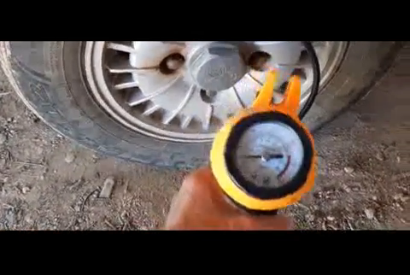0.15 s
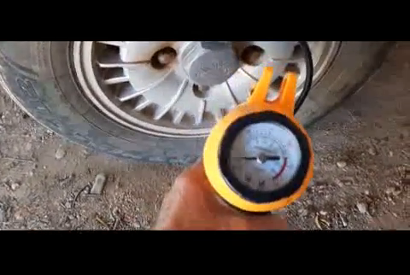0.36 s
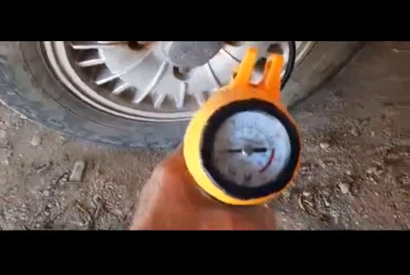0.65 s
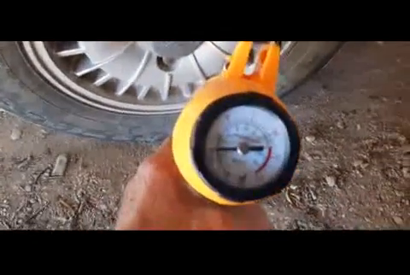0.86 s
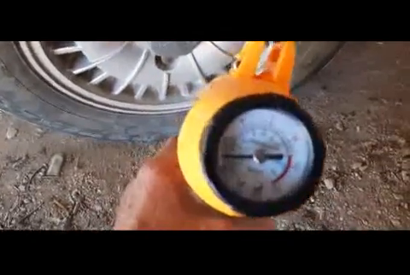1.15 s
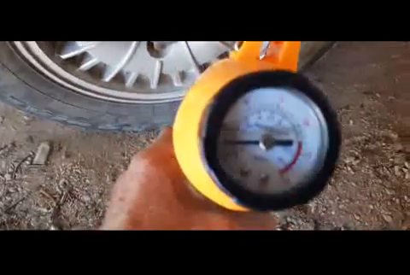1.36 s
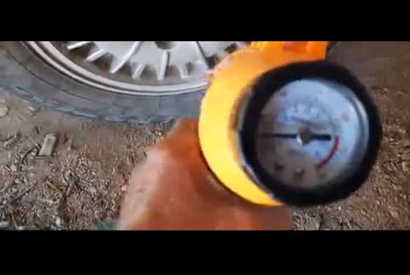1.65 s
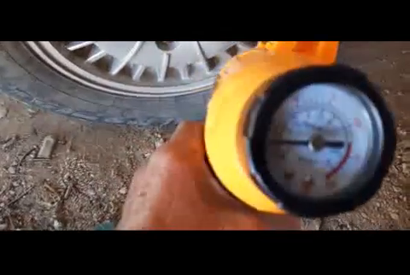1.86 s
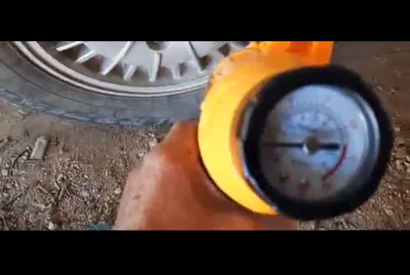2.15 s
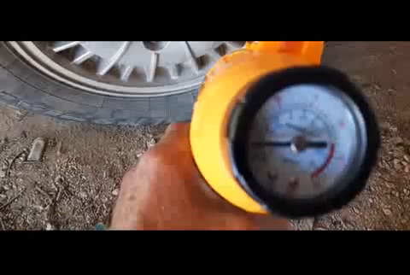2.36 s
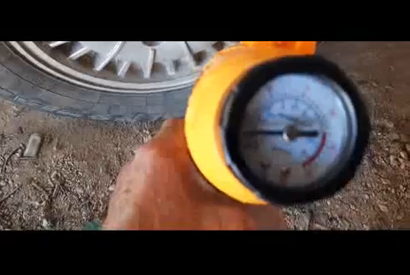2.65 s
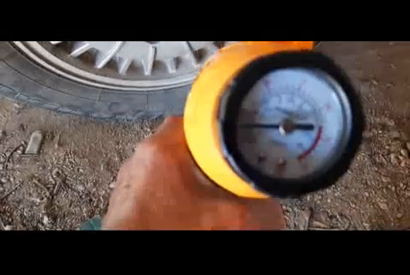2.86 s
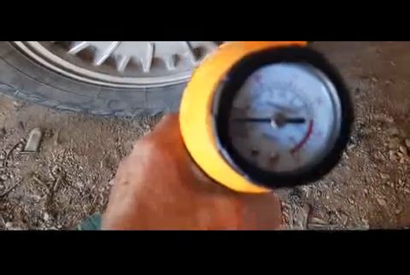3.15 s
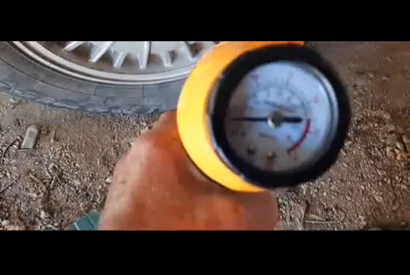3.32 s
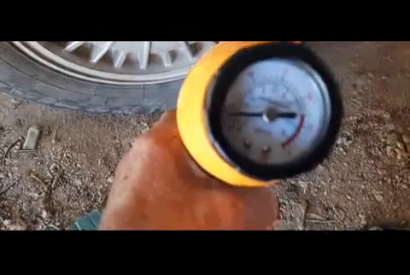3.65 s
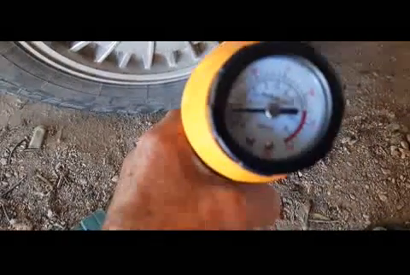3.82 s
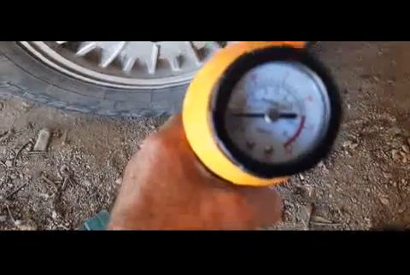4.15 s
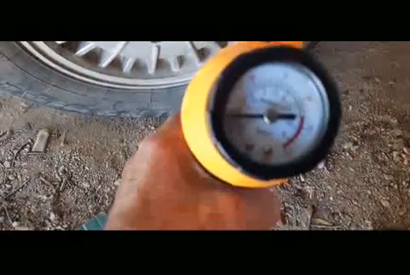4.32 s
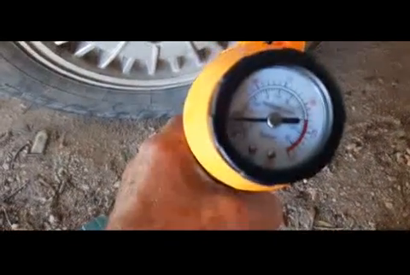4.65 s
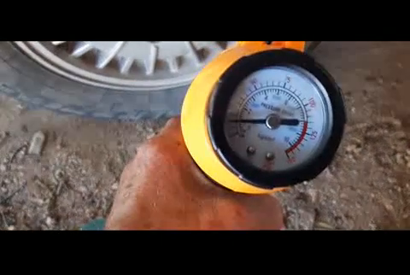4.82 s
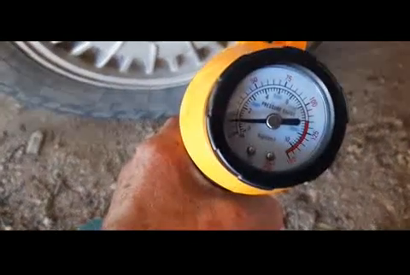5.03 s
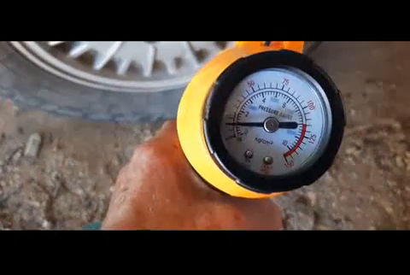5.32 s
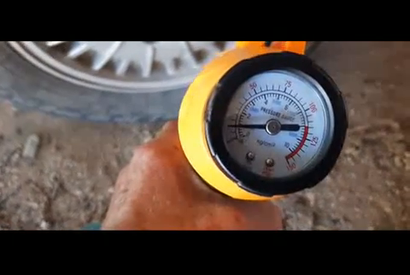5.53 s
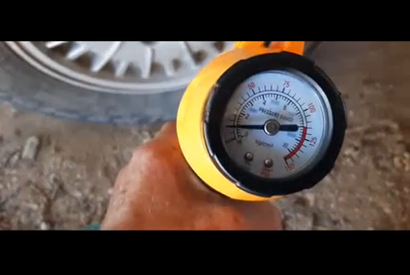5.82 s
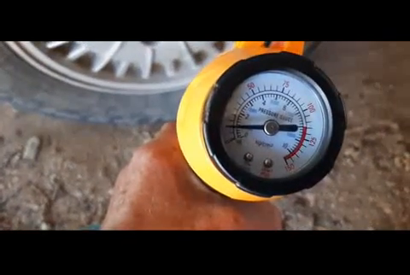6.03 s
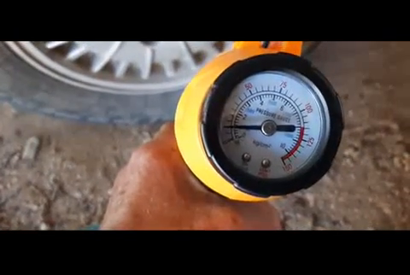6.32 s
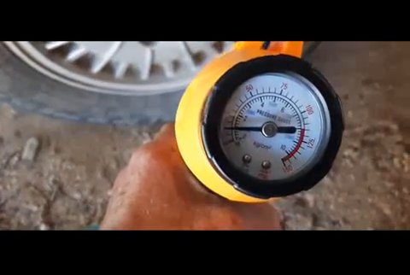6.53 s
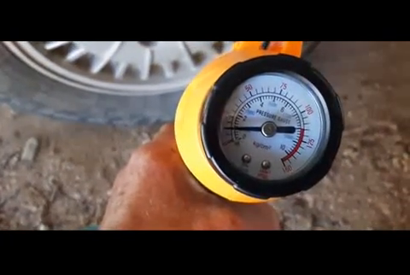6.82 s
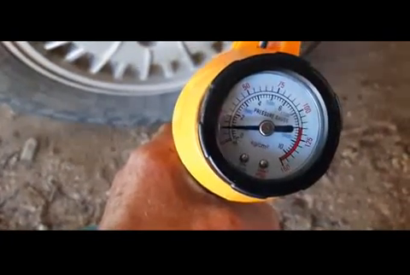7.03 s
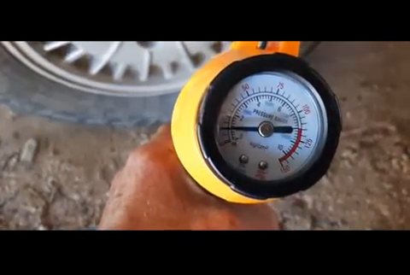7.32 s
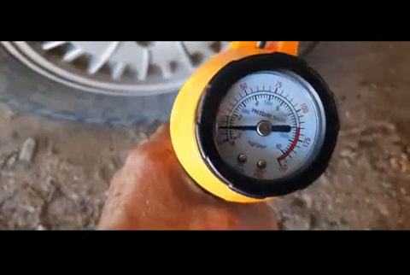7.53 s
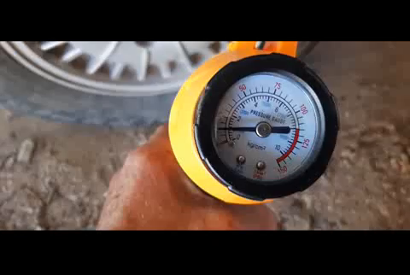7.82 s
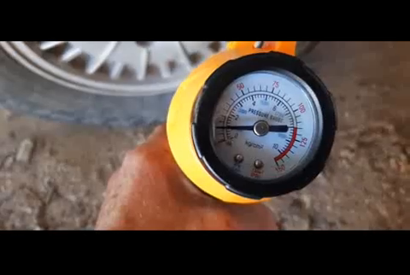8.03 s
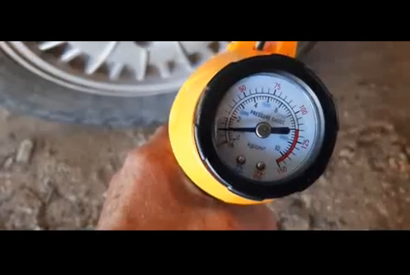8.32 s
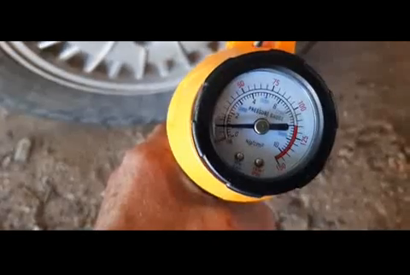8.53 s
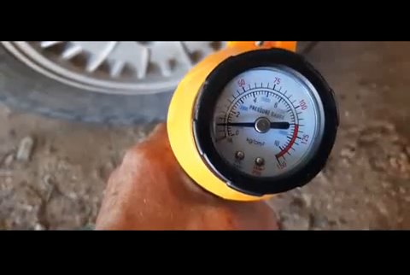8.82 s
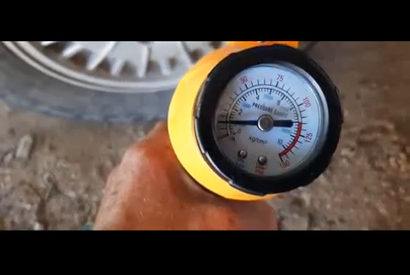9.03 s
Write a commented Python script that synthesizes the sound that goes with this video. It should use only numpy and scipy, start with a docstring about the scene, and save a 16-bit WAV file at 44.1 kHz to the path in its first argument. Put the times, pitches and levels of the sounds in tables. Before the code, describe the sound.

Close, loud droning chatter of a handheld air pump, rapid piston knocks ringing its plastic case over gritty whine and constant hiss.

```python
"""Outdoors: a small electric tyre inflator runs steadily, held in the hand close to two microphones.
The motor drives the crank through pinion and spur gear. Every turn the piston gives a burst of knocks (crank
harmonics) that ring the plastic case, with rattle (noise bursts through resonances) and valve taps (decaying sines).
The gear teeth grind (coloured noise) and squeal once a turn (mesh harmonics with a noisy rough edge).
Air hisses through the pump (pulsed noise) over a low rumble."""
import sys
import numpy as np
from scipy import signal
from scipy.fft import rfft, irfft
from scipy.io import wavfile
from scipy.ndimage import uniform_filter1d

SR = 44100
rng = np.random.default_rng(int(sys.argv[2]) if len(sys.argv) > 2 else 0)


def wav_out(sig):
    """Save sig, one row per channel (or a flat mono array), as 16-bit PCM at SR to the path in sys.argv[1]."""
    wavfile.write(sys.argv[1], SR, np.round(np.clip(np.atleast_2d(sig).T, -1, 1) * 32767).astype(np.int16))


N = 404397
TIME_S = np.arange(N) / SR
FREQS_HZ = np.fft.rfftfreq(N, 1 / SR)

# crank rate, slowing a little as the tyre fills: (time [s], rate [turns/s])
CRANK_RATE = [(0, 59.3), (.4, 59.23), (5, 59.13), (9.17, 59.05)]
GEAR_TEETH, PINION_TEETH = 53, 11
# piston and valve knocks: (place in turn [0-1], level [dB], brightness [dB/kHz])
KNOCKS = [(0.047, 1.5, -2), (0.123, -7.5, 5.5), (0.571, 6.5, -6), (0.692, 3.5, -11.5), (0.8, 5.5, -2),
          (0.91, -0.5, 3.5)]
# steady pump tone: (multiple of crank rate, relative level [dB])
PUMP_ORDERS = [(1, -17), (2, -9.5), (3, -21.5), (4, -18), (5, -23), (6, -20.5), (7, -13), (8, -3),
               (9, -3.5), (10, -9.5), (11, -13.5), (12, -8.5), (13, -12.5), (14, -4), (15, -13.5),
               (16, -10.5), (17, -1), (18, -5), (19, -13), (20, -23), (21, -18.5), (22, -11), (23, -14),
               (24, -16), (25, -9), (26, -2), (27, 0), (28, -2.5), (29, -1.5), (30, -14.5), (32, -26.5),
               (33, -28.5), (35, -22), (40, -24)]
# plastic case resonances: (centre [Hz], width [Hz], level [dB])
CASE_MODES = [(490, 130, -19), (810, 550, -10.5), (1005, 130, -10.5), (1316, 630, -5), (1643, 103, 2)]
# taps of two reed valves and piston seal: (place in turn [0-1], ring [Hz], decay [s], level [dB])
VALVE_TAPS = [(0.3, 2970, 0.002, -38), (0.08, 3400, 0.0011, -40), (.9, 2280, 0.00045, -43)]
# motor shaft lines, the 11th being the steady mesh of the pinion's teeth: (multiple of motor rate, level [dB])
MOTOR_ORDERS = [(1, -49.5), (5, -32), (11, -39)]
# gear grind through the housing: (frequency [Hz], level [dB])
GRIND_COLOUR = [(1850, -1.5), (2050, 0), (2350, 3.5), (2600, -2.5), (2850, 3.5), (3130, -7.5), (3450, 6),
                (3800, -6), (4230, 5), (4400, -10), (4600, 3.5), (4800, -9), (5080, -0.5), (5250, -28)]
# tooth squeal: (multiple of mesh rate, relative level [dB])
SQUEAL_ORDERS = [(2, -8), (3, 4.5), (4, -1)]
# squeal course: (time [s], level [dB])
SQUEAL_LEVEL = [(0, -36), (.65, -40), (.85, -33), (1.2, -32), (2.1, -32), (2.7, -33.5), (3.3, -31.5),
                (4.1, -36), (5.2, -32.5), (6.6, -34), (7.8, -32), (8.3, -32.5), (9.1, -31.5)]
# harshest squeaks: (time [s], peak [dB], left minus right [dB])
SQUEAKS = [(1.474, 0, 6), (2.557, 0, 1), (3.012, 0, 0), (4.634, 0, 0), (4.939, -5, 0), (5.075, -3, -7),
           (5.311, -5, -1), (5.48, -2, 0), (6.104, -3, -2), (6.663, -3, 1), (7.544, -3, 2), (7.561, -2, 2),
           (7.8485, 0, -5), (7.933, -3, 0), (8.779, -2, 0), (8.882, -2, 0)]
# resonances of the squeal's rough edge: (centre [Hz], width [Hz], level [dB])
SIZZLE_MODES = [(6320, 40, 4), (9280, 100, 5.5), (12060, 170, -2.5), (12770, 220, -0.5)]
# air hiss through cylinder and valve: (frequency [Hz], level [dB])
AIR_COLOUR = [(5300, -10.5), (5700, -6.5), (6250, -3), (6600, -11.5), (7700, -9.5), (8100, -36), (8500, -1),
              (9400, 6), (10100, 3), (10500, 5), (11000, 1), (11700, 3), (13000, 1)]
# shaking pump and open air: (frequency [Hz], level [dB])
RUMBLE_COLOUR = [(20, -8), (100, 0.5), (200, -6.5), (380, -4.5), (900, -10.5), (1800, -2.5)]
# flexing side walls: (multiple of crank rate, level [dB])
WALL_ORDERS = [(15, -46), (21, -40), (23, -45), (30, -44), (52, -47)]
# uneven radiation to the microphones: (frequency [Hz], left minus right [dB])
SIDES = [(60, 4.5), (400, 4.4), (520, 3.3), (700, -.5), (830, 0), (1020, -7), (1200, -4.5), (1400, .5),
         (1650, -.5), (2230, -2), (2500, .5), (3400, 0), (4200, 3.5), (4500, 0), (5500, .5), (6270, 3),
         (6500, 0), (8900, 1.5), (9500, -1.5), (9800, 1), (10500, -.5)]
# paths around case and hand: (frequency [Hz], left lead [rad])
LEAD = [(0, 1), (60, 0.5), (300, 0.3), (600, 0.43), (1000, 0.32), (1640, 0.54), (3100, 5), (3530, -2.5),
        (3790, 3.5), (5510, -0.7), (6800, 3.5), (7670, 12.5), (8180, 16.5), (9300, 18.5), (11400, 26),
        (12400, 34.5), (12700, 32), (13400, 36)]
# colour with the pump held further off: (frequency [Hz], gain [dB])
FAR_COLOUR = [(580, 0), (690, -5.5), (850, 0), (1030, -2), (1200, 5), (1450, -1.5), (2300, 0), (3000, 3.5),
              (3800, -6), (4200, 0.5), (5000, -4.5), (6200, 2), (7600, 8), (9000, -2.5), (13000, 1)]
# pump brought closer: (time [s], share of far colour [0-1])
APPROACH = [(0, 1), (.6, 1), (1.1, 0.25)]

KNOCK_DB, RATTLE_DB, GRIND_DB, HISS_DB, RUMBLE_DB = -19, -24.5, -25, -25, -37.5
HISS_WAVER_DB, SQUEAL_WAVER_DB = 0.73, .8
SIZZLE_DB, CATCH_DB, SCRAPE_DB = 1.2, -13.5, -15  # sizzle: relative to SQUEAL_LEVEL
# extra case ring at the nearest pass: bell centre, 1/e half width, peak
NEAREST_S, NEAREST_WIDTH_S, NEAREST_DB = 1.7, 1.05, 1.4
TOP_HZ = 13030


def piston(turns, crank_hz, ring_db, ring_hz=1620, ring_width_hz=190, jitter_turns=0.0016, limp_turns=0.0036):
    """Crank harmonics phased to line up at the knocks; the main case ring has its own gain."""
    place, knock_db, brightness = np.transpose(KNOCKS)
    cycle = np.arange(2048) / 2048
    body, ring = np.zeros((2, len(cycle)))
    for order, db in PUMP_ORDERS:
        order = round(order)
        hz = order * crank_hz
        strength = undb(knock_db + brightness * hz / 1000)
        lag_rad = np.angle(-np.sum(strength * np.exp(-2j * np.pi * order * place)))
        partial = undb(db) * np.cos(2 * np.pi * order * cycle + lag_rad)
        in_ring = np.exp(-((hz - ring_hz) / ring_width_hz) ** 4)
        body += (1 - in_ring) * partial
        ring += in_ring * partial
    # rod play: knocks early or late, often by turns
    limp = limp_turns * walk(11) * np.cos(np.pi * turns)
    angle = turns + jitter_turns * walk(260) + limp
    body = np.interp(angle, cycle, body, period=1)
    ring = np.interp(angle, cycle, ring, period=1)
    return unit(body + undb(ring_db) * ring)


def rattle(turns, loose_db=-8, spread_turns=0.011):
    """Loose parts chatter at every knock, most at the bright ones, and ring the case."""
    chatter = 0
    for place, db, brightness in KNOCKS:
        burst = bump(turns, place, spread_turns, scatter_db=1.0, wander_turns=0.0051)
        chatter = chatter + undb(db + brightness) * burst
    ring = resonate((undb(loose_db) + chatter) * stereo_noise(alike=0.72), CASE_MODES)
    return unit(np.tanh(ring / 2.5))  # little room to move limits the swing


def valves(turns, scatter_db=4.5, jitter_s=.00004):
    """Each reed and the seal slap once a turn, ring briefly, and vary in force and timing."""
    taps = 0
    for place, hz, decay_s, db in VALVE_TAPS:
        own = turns - place
        delay_s = jitter_s * (2 + per_turn(own))
        age_s = np.maximum(own % 1 / CRANK_RATE[0][1] - delay_s, 0)
        ring = np.sin(2 * np.pi * hz * age_s) * age_s * np.exp(-age_s / decay_s)
        taps = taps + undb(db) * unit(ring * undb(scatter_db * per_turn(own)))
    return taps


def motor(turns, wobble_turns=0.0088):
    """Clean lines locked to the motor shaft, geared nearly five times as fast as the crank; the 11th is the
    pinion's tooth mesh."""
    shaft = turns * GEAR_TEETH / PINION_TEETH + wobble_turns * walk(10)
    return sum(np.sqrt(2) * undb(db) * np.sin(2 * np.pi * round(order) * shaft) for order, db in MOTOR_ORDERS)


def gears(turns, surge_db=1.3, grain_db=0.15, tick_db=-3):
    """Rough teeth grind, and tick as the first four knocks take up their play."""
    ticks = sum(bump(turns, place, .012, scatter_db=3, wander_turns=.005) for place, _, _ in KNOCKS[:4])
    load = (1 + undb(tick_db) * ticks) * undb(surge_db * walk(70) + grain_db * walk(400))
    grind = colour(stereo_noise(alike=0.38) * load, GRIND_COLOUR)
    return waver(grind, np.linspace(2000, 5000, 12), rate_hz=25, depth_db=2)


def tooth_bite(turns):
    """Tooth pressure, one broad swell a turn."""
    return unit(bump(turns, .345, .075, scatter_db=2.4, wander_turns=.02))


def squeal(turns, force, slip_cycles=0.016):
    """Teeth sing at multiples of the mesh rate, slipping a little out of step."""
    mesh = turns * GEAR_TEETH + slip_cycles * walk(310)
    tone = sum(undb(db) * np.sin(2 * np.pi * round(order) * mesh) for order, db in SQUEAL_ORDERS)
    return force * unit(tone)


def tooth_catches(decay_s=.0008):
    """Force at each microphone where a tooth catches hard: two-sided exponential peaks."""
    force = 0
    for at_s, db, pan_db in SQUEAKS:
        side_db = np.array([[pan_db], [-pan_db]]) / 2
        force = force + undb(db + side_db) * np.exp(-np.abs(TIME_S - at_s) / decay_s)
    return force


def sizzle(bite, friction):
    """Rough edge of the squeal: rubbing noise whose resonances rise and fall separately."""
    rub = stereo_noise(alike=.6) * (bite + .25)
    rough = waver(resonate(rub, SIZZLE_MODES), [6270, 9300, 12120, 12870], rate_hz=25, depth_db=2.6)
    return rough * friction * undb(SIZZLE_DB)


def scrape(catch):
    """Noise burst at each hard catch, coloured like the air hiss."""
    return undb(SCRAPE_DB) * catch * colour(stereo_noise(alike=.3), AIR_COLOUR)


def air(turns, surge_db=2.2, puff=0.039, spit=0.13):
    """Turbulent hiss with a puff on each intake stroke and a brief valve spit."""
    intake = bump(turns, .36, .12, scatter_db=3, wander_turns=.04)
    valve = bump(turns, .32, .015, scatter_db=5, wander_turns=.06)
    flow = (1 + puff * intake + spit * valve) * undb(surge_db * walk(70))
    hiss = colour(stereo_noise(alike=0.27) * flow, AIR_COLOUR)
    return waver(hiss, np.linspace(5500, 13000, 18), rate_hz=35, depth_db=2)


def walls(turns):
    """Flexing side walls push one microphone while pulling the other: opposite polarity."""
    tone = 0
    for order, db in WALL_ORDERS:
        partial = np.sin(2 * np.pi * (order * turns + rng.random()))
        tone = tone + undb(db + walk(3)) * np.sqrt(2) * partial
    return np.array([tone, -tone])


def rumble():
    """Low noise of the shaking pump and the open air."""
    return undb(RUMBLE_DB) * colour(stereo_noise(alike=.35), RUMBLE_COLOUR)


def microphones(x):
    """Each side hears its own balance and phase of the pump's sound."""
    ratio = undb(along(SIDES, FREQS_HZ))
    half_lead = np.exp(.5j * np.interp(FREQS_HZ, *np.transpose(LEAD)))
    sides = np.array([ratio * half_lead, 1 / half_lead]) * 2 / (1 + ratio)
    return irfft(rfft(x) * sides, N)


def approach(x):
    """Crossfade away from the far colour as the hand brings the pump closer."""
    far = irfft(rfft(x) * undb(along(FAR_COLOUR, FREQS_HZ)), N)
    return x + (far - x) * np.interp(TIME_S, *np.transpose(APPROACH))


def undb(db):
    """Decibels to gain."""
    return 10 ** (np.asarray(db) / 20)


def unit(x):
    """Scale to rms 1."""
    return x / np.sqrt(np.mean(x ** 2))


def along(points, hz):
    """Read (frequency [Hz], value) points on a log-frequency axis."""
    f_hz, value = np.transpose(points)
    return np.interp(np.log(hz + 1), np.log(f_hz), value)


def colour(x, points):
    """Filter x by (frequency [Hz], level [dB]) points, steep beyond the ends; rms 1."""
    low_skirt = np.minimum(FREQS_HZ / points[0][0], 1) ** 10
    high_skirt = np.minimum(points[-1][0] / (FREQS_HZ + 1), 1) ** 10
    return unit(irfft(rfft(x) * undb(along(points, FREQS_HZ)) * low_skirt * high_skirt, N))


def resonate(x, modes):
    """Filter x by summed (centre [Hz], width [Hz], level [dB]) resonances; rms 1."""
    response = sum(undb(db) / (1 + (2 * (FREQS_HZ - hz) / width_hz) ** 2) for hz, width_hz, db in modes)
    return unit(irfft(rfft(x) * response, N))


def waver(x, edges_hz, rate_hz, depth_db):
    """Let overlapping bands of x rise and fall, each on its own."""
    spectrum = rfft(x)
    out = 0
    for band in np.eye(len(edges_hz)):
        part = irfft(spectrum * np.interp(FREQS_HZ, edges_hz, band), N)
        out = out + part * undb(depth_db * walk(rate_hz))
    return out


def walk(rate_hz):
    """Random levels, a new one each 1 / rate_hz, joined by slews; rms 1."""
    hold = int(SR / rate_hz)
    steps = np.repeat(rng.standard_normal(N // hold + 1), hold)
    return unit(uniform_filter1d(steps, hold)[:N])


def stereo_noise(alike):
    """White noise at two microphones, with a share of power in common."""
    common, *own = rng.standard_normal((3, N))
    return np.sqrt(alike) * common + np.sqrt(1 - alike) * np.array(own)


def per_turn(turns):
    """One bounded random value for each turn."""
    return np.clip(rng.standard_normal(1024), -2, 2)[np.floor(turns).astype(int)]


def bump(turns, place, width_turns, scatter_db, wander_turns):
    """Gaussian bump once a turn, each with its own size and a slightly different place."""
    own = turns - place + .5
    offset = own % 1 - .5 + wander_turns * per_turn(own)
    return np.exp(-.5 * (offset / width_turns) ** 2) * undb(scatter_db * per_turn(own))


def scene():
    """Crank angle drives the pump's parts; the colour shifts as the hand brings it close."""
    crank_hz = np.interp(TIME_S, *np.transpose(CRANK_RATE))
    turns = .055 + np.cumsum(crank_hz) / SR
    nearest_db = NEAREST_DB * np.exp(-((TIME_S - NEAREST_S) / NEAREST_WIDTH_S) ** 2)
    knocks = piston(turns, crank_hz.mean(), nearest_db) * undb(KNOCK_DB + nearest_db / 2)
    # case tone shifts gently as the hand sways
    knocks = waver(knocks, [500, 680, 850, 1150, 1350, 1600], rate_hz=.8, depth_db=.35)
    strokes = knocks + rattle(turns) * undb(RATTLE_DB + nearest_db) + valves(turns)

    bite = tooth_bite(turns)
    friction = undb(np.interp(TIME_S, *np.transpose(SQUEAL_LEVEL)) + SQUEAL_WAVER_DB * walk(4.4))
    catch = tooth_catches()
    sing = squeal(turns, bite * friction + catch * undb(CATCH_DB))
    teeth = gears(turns) * undb(GRIND_DB) + sing + sizzle(bite, friction) + scrape(catch)

    hiss = air(turns) * undb(HISS_DB + HISS_WAVER_DB * walk(11))
    pump = strokes + motor(turns) + teeth + hiss + rumble()
    return approach(microphones(pump)) + walls(turns)


def record(dry):
    """Soft-limit the highest peaks, then cut the top steeply."""
    rounded = dry / (1 + (dry / .85) ** 6) ** (1 / 6)
    low_pass = signal.ellip(12, .2, 80, TOP_HZ, fs=SR, output="sos")
    return signal.sosfilt(low_pass, rounded)


dry = scene()
out = record(dry)
wav_out(out)
```